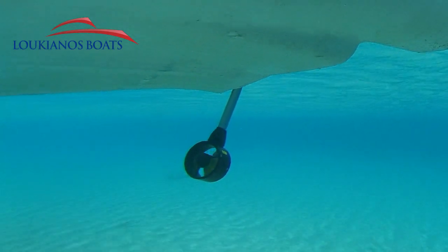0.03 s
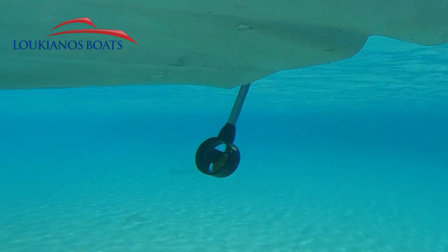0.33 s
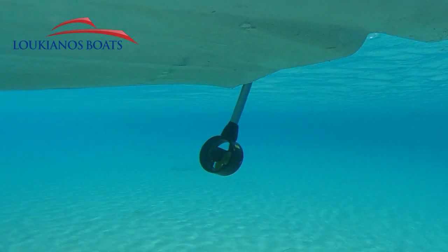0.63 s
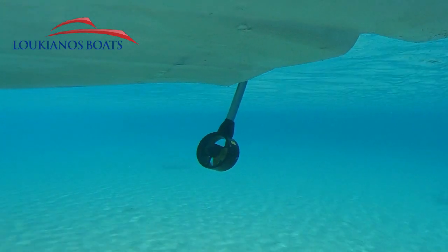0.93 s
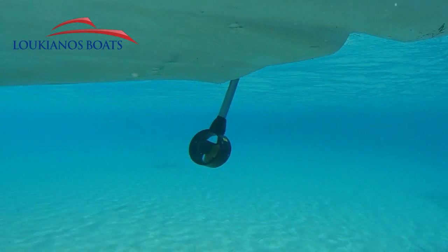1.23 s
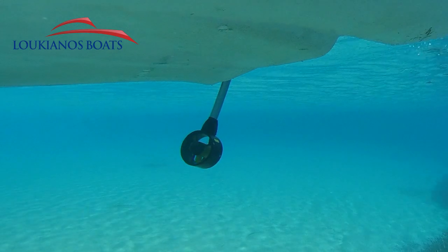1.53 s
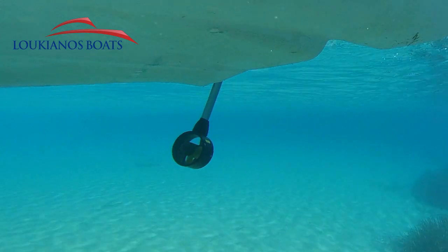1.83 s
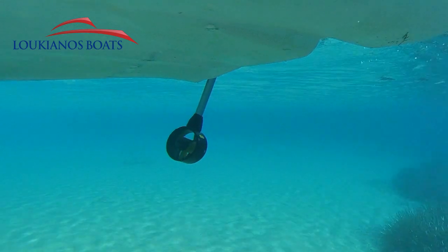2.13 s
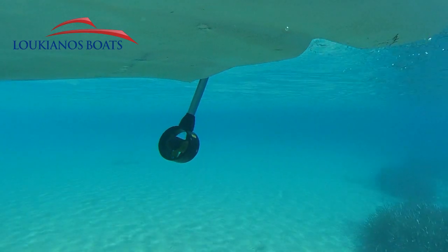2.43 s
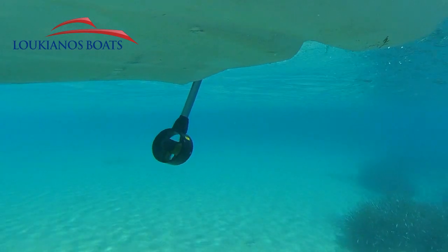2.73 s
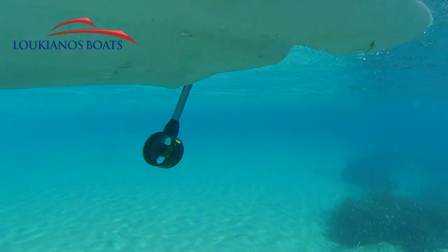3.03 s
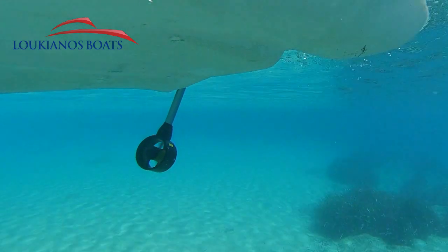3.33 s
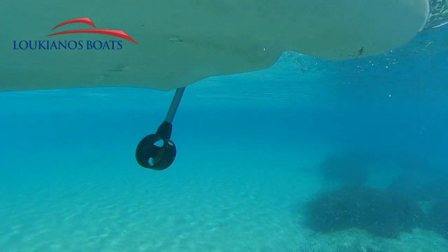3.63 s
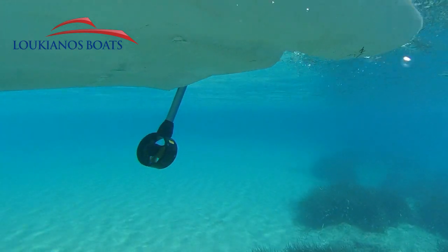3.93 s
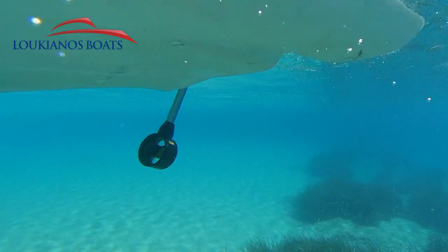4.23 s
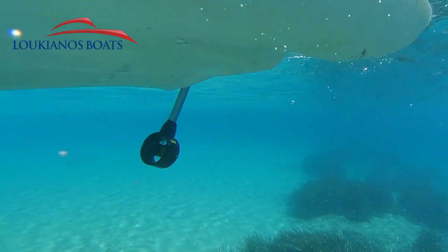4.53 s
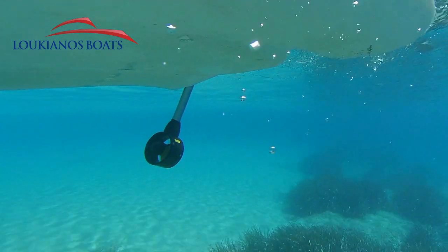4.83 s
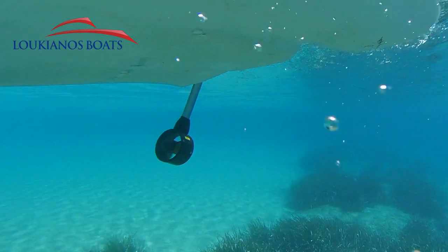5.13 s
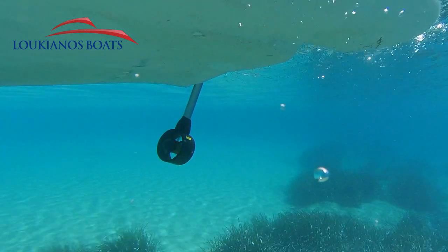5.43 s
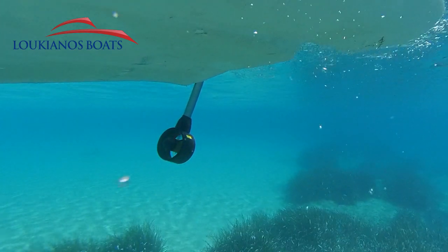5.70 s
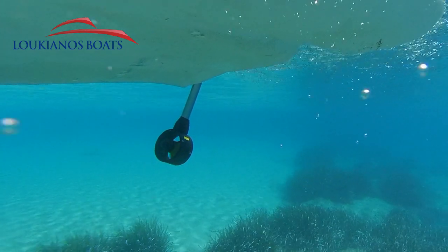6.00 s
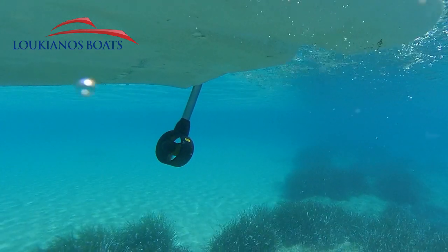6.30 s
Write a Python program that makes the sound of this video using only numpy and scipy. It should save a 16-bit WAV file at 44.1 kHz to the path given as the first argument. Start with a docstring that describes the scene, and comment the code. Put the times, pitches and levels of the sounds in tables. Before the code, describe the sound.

Underwater, an electric boat motor hums, then steps up to a faster hum as bubbles plink, fizz and gulp, with occasional sharp clicks.

```python
"""Electric outboard motor, underwater

A small boat's motor hums, heard from a camera in the water. Halfway the hum gives way to a faster one
and the wake arrives: small bubbles plink and fizz, then big ones gulp close by. Sharp clicks snap now
and then. The camera's case booms near 400 Hz and lets the treble in mostly on its left."""
import sys
import numpy as np
from scipy import signal
from scipy.fft import rfft, irfft
from scipy.io import wavfile
from scipy.ndimage import uniform_filter1d

SR = 44100
rng = np.random.default_rng(int(sys.argv[2]) if len(sys.argv) > 2 else 0)


def master(y):
    """Save y as 16-bit WAV."""
    cut = np.clip(np.atleast_2d(y).T, -1, 1)
    pcm = np.round(cut * 32767)  # scale
    wavfile.write(sys.argv[1], SR, pcm.astype(np.int16))


N = 289296
TIME, FREQS = np.arange(N) / SR, np.fft.rfftfreq(N, 1 / SR)


# How loud the slow hum and the fast hum are: t/s, level/dB
SLOW_LEVELS = [(0, -44.5), (.35, -40.5), (.75, -43), (1.5, -43.5), (2.5, -43.5), (2.8, -41.5), (3.0, -42),
               (3.15, -44.5)]
FAST_LEVELS = [(2.97, -57), (3.16, -35.5), (3.5, -35.5), (4.1, -36.5), (5, -32), (6.56, -33)]
# The tones in each hum: multiple of the shaft's turning rate, level/dB
SLOW_TONES = [(3, -7.5), (6, -15.5), (8, -37), (9, -11.5), (10, -26), (11, -19), (12, 2), (13, -4),
              (14, -11.5), (15, -10), (24, -19), (25, -23), (27, -28.5), (75, -29), (84, -19.5)]
FAST_TONES = [(1, -24.5), (3, -16.5), (4, -23.5), (6, -13.5), (9, 1), (10, -12), (11, -15), (12, -36),
              (14, -17), (84, -33.5)]

def motor(slow_turns_per_s=31.11, fast_turns_per_s=42.48, whine_hz=14165):
    """A slow hum gives way to a fast one, joined by the thin whine of the drive switching its current."""
    angle = 2 * np.pi * np.cumsum(whine_hz + 4 * drift(25.3)) / SR
    whine = amp(-70 + 3 * drift(15)) * np.sin(angle)
    sizzle = amp(-55) * drift(760) * np.cos(angle)
    fade_in = np.clip((TIME - FAST_LEVELS[0][0]) / 0.15, 0, 1)
    slow = hum(slow_turns_per_s, SLOW_LEVELS, SLOW_TONES)
    fast = hum(fast_turns_per_s, FAST_LEVELS, FAST_TONES)
    return slow + fast + fade_in * (whine + sizzle)


def hum(turns_per_s, levels, tones, throb_hz=389):
    """Tones locked to the propeller shaft beat together into one soft throb each turn."""
    times, level_db = np.transpose(levels)
    turns = np.cumsum(turns_per_s * (1 + 0.0012 * drift(5.2))) / SR
    out = np.zeros(N)
    for multiple, db in tones:
        lag = (multiple - throb_hz / turns_per_s) ** 2  # grows away from the strongest tones
        out += amp(db + 0.5 * drift(5)) * np.cos(2 * np.pi * multiple * turns - lag)
    running = uniform_filter1d(((TIME >= times[0]) & (TIME <= times[-1])) * 1., size=4000)
    return np.sqrt(2) * out * amp(np.interp(TIME, times, level_db)) * running


# The clearest big bubbles: t/s, level/dB, f/Hz, length/s
BIG_BUBBLES = [(1.471, -31, 400, 0.0077), (3.5, -11.5, 390, 0.0086), (4.796, -14, 424, 0.057),
               (4.832, -13.5, 437.5, 0.054), (4.893, -14.5, 422, 0.034), (4.937, -11, 630, 0.02),
               (4.94, -13.5, 455, 0.021), (5.03, -10, 447, 0.031), (5.069, -5, 417, 0.012),
               (5.083, -10.5, 418, 0.019), (5.154, -3, 381, 0.02), (5.214, -1.5, 386, 0.013),
               (5.228, -14, 334, 0.033), (5.278, -13, 470, 0.012), (5.31, -12.5, 360.4, 0.038),
               (5.457, -17, 368, 0.023), (5.574, -20, 356, 0.028), (5.59, -16, 340.8, 0.066),
               (5.615, -27, 326, 0.026), (5.662, -13.5, 342, 0.017), (5.766, -13.5, 387.5, 0.03),
               (5.811, -12.5, 386, 0.0067), (5.835, -14, 380, 0.05), (5.941, -8.5, 417, 0.012),
               (5.962, -6.5, 407, 0.015), (6.001, -3.5, 378, 0.017), (6.098, -5, 367, 0.031),
               (6.172, -16, 396, 0.017), (6.202, -5.5, 356.5, 0.028), (6.234, -10, 399, 0.025),
               (6.323, -7.5, 411.5, 0.03), (6.373, -14.5, 441, 0.032)]

def gulps(relax_s=0.0014, glide=0.0563):
    """A big bubble breaks off tight and high, relaxes, then lifts in pitch until it is choked off."""
    out, t = np.zeros(N), np.arange(5000) / SR
    case_note = bubble(hz=585, cycles=0.81, rise=0.22, glide=0.014)
    for start, db, hz, length in BIG_BUBBLES:
        shape = (1 - np.exp(-t * hz / 1.05)) * np.exp(-(t / length) ** 2)
        pitch = hz * (1 + 0.35 * np.exp(-t / relax_s) + glide * t / length)
        add(out, start, amp(db) * shape / shape.max() * np.sin(2 * np.pi * np.cumsum(pitch) / SR))
        add(out, start, amp(db - 15) * case_note)  # each gulp also rings the case's upper note
    return out


# The nearest small bubbles: t/s, level/dB, f/Hz
SMALL_BUBBLES = [(0.819, -15.5, 2610), (2.163, -32, 1740), (2.283, -24, 1440), (2.321, -30.5, 3020),
                 (2.541, -23, 3300), (2.847, -15, 1490), (2.894, -23.5, 1260), (2.933, -29, 1390),
                 (2.952, -27, 740), (3.02, -34, 2220), (3.135, -20.5, 1504), (3.178, -28, 1300),
                 (3.283, -26.5, 2560), (3.327, -23.5, 658), (3.4, -24.5, 1200), (3.43, -31, 2340),
                 (3.452, -20.5, 2340), (3.462, -17.5, 756), (3.475, -17.5, 1470), (3.501, -15.5, 660),
                 (3.503, -20, 1314), (3.545, -33, 1150), (3.579, -34, 2360), (3.6, -16, 2230),
                 (3.62, -22, 1730), (3.676, -30, 1460), (3.691, -18.5, 2460), (3.741, -20, 1350),
                 (3.756, -24.5, 1440), (3.772, -12, 2020), (3.916, -7.5, 766), (3.934, -20, 1280),
                 (3.9861, -9, 1564), (4.008, -12.5, 2430), (4.017, -15, 2540), (4.018, -21.5, 1050),
                 (4.05, -11, 710), (4.053, -18, 1090), (4.094, -18, 676), (4.1, -15.5, 1115),
                 (4.125, -16.5, 567), (4.156, -20.5, 1400), (4.169, -20.5, 1230), (4.207, 1.5, 554),
                 (4.209, -4.5, 691), (4.238, -16, 1400), (4.26, -17, 2310), (4.275, -8.5, 3740),
                 (4.282, -14, 2920), (4.281, -15, 1980), (4.353, -15, 2260), (4.373, -20, 2640),
                 (4.414, -19.5, 636), (4.487, -23, 1250), (4.51, -14.5, 663), (4.541, -20.5, 1170),
                 (4.633, -15, 1890), (4.649, -18.5, 1240), (4.721, -21, 2850), (4.765, -20, 4420),
                 (4.796, -19, 556), (4.845, -16, 2060), (4.909, -13, 644), (4.985, -14, 630),
                 (5.004, -9, 570), (5.015, -17.5, 1000), (5.023, -21, 1150), (5.034, -7, 617),
                 (5.036, -18, 1410), (5.196, -15, 2510), (5.28, -17.5, 995), (5.325, -22, 1130),
                 (5.403, -20.5, 814), (5.477, -18.5, 1630), (5.549, -19, 2760), (5.555, -13, 653),
                 (5.607, -16, 670), (5.642, -21, 2410), (5.645, -16, 670), (5.661, -24, 3070),
                 (5.666, -16.5, 667), (5.702, -23.5, 2470), (5.725, -31, 1530), (5.736, -12, 622),
                 (6.002, -14, 753), (6.155, -29, 2670), (6.211, -22, 2920), (6.233, -16, 687),
                 (6.371, -14.5, 957)]

def plinks(case_hz=416.5, hardest_knock_hz=804):
    """Each near bubble rings, sheds a short crackle just below its own pitch and knocks on the case with its
    pressure."""
    out, knock = np.zeros(N), bubble(case_hz, cycles=1.62, rise=0.92, glide=0)
    for start, db, hz in SMALL_BUBBLES:
        add(out, start, amp(db) * bubble(hz, cycles=4.6, rise=0.6, glide=0.03))
        add(out, start, amp(db - 11) * crackle(0.86 * hz))
        octaves_away = abs(np.log2(hz / hardest_knock_hz))
        add(out, start, amp(db - 1.5 - 8 * octaves_away) * knock)
    return cut_bass(out, 174)  # a bubble gives off little bass


def bubble(hz, cycles, rise, glide):
    """One bubble rings and dies away, its pitch lifting as it floats up."""
    age = np.arange(int(7 * cycles * SR / hz)) * hz / SR  # counted in cycles, like the rise and fade
    shape = (1 - np.exp(-age / rise)) * np.exp(-age / cycles)
    return shape / shape.max() * np.sin(2 * np.pi * age * (1 + glide * age / cycles / 2))


def crackle(hz, fade_s=0.0051):
    """A short puff of noise around one pitch."""
    t, freqs = np.arange(2048) / SR, np.fft.rfftfreq(2048, 1 / SR)
    fizz = irfft(rfft(rng.standard_normal(len(t))) * band(freqs, hz, octaves=0.74))
    puff = fizz * (1 - np.exp(-t * hz)) * np.exp(-t / fade_s)
    return puff / abs(puff).max()


# How thick the wake is around the camera: t/s, large bubbles' level/dB, small bubbles' level/dB
WAKE_THICKNESS = [(2.7, -13, -28), (3.1, -12, -5), (3.4, -10.5, -14), (3.5, -4, -1.5), (3.95, -2.5, -2),
                  (4.15, 2, 3.5), (4.65, -1, -1), (5.05, 1.5, 0.5), (5.55, -0.5, -3.5), (6.0, -6.5, -6),
                  (6.56, -2, -0.5)]

def wake():
    """Clouds of bubbles swell over a soft wash of far ones as the wake arrives; faint pips never stop."""
    times, large, small = np.transpose(WAKE_THICKNESS)
    fade_in = np.clip((TIME - times[0]) / 0.35, 0, 1)
    clumps = unit(amp(2.3 * drift(25)))  # shared by bubbles of every size
    gurgle = cloud(515, 1080, per_s=900, spread_db=5, tilt_db=-10, cycles=4.7, clumping=0.39, sizes=14)
    babble = cloud(1082, 1655, per_s=400, spread_db=5, tilt_db=-1, cycles=6, clumping=0.5, sizes=8)
    fizz = cloud(1900, 5200, per_s=1000, spread_db=6, tilt_db=-14, cycles=10, clumping=0.75, sizes=22)
    spray = cloud(7370, 13900, per_s=540, spread_db=14.5, tilt_db=-12, cycles=8.8, clumping=.49, sizes=16)
    layers = (swell(large, db=-29, follow=1.76) * gurgle
              + swell(large, db=-37, follow=1) * babble
              + swell(small, db=-43, follow=0.9) * fizz
              + swell(small, db=-51, follow=1.96) * spray
              + swell(large, db=-41.5, follow=0.96) * wash())
    pips = cloud(1248, 6070, per_s=180, spread_db=5, tilt_db=1, cycles=7.7, clumping=0.39, sizes=14)
    return fade_in * clumps * layers + amp(-63) * pips


def swell(thickness_db, db, follow):
    """A layer grows louder with the wake, by `follow` dB for each dB of thickness."""
    times = np.transpose(WAKE_THICKNESS)[0]
    return amp(db + follow * np.interp(TIME, times, thickness_db))


def cloud(low_hz, high_hz, per_s, spread_db, tilt_db, cycles, clumping, sizes):
    """Bubbles of many sizes are born in clumps; tilt_db is the change in level for each octave up."""
    out, chance = np.zeros((2, N)), per_s / sizes / SR * np.exp(clumping * drift(25))
    for hz in np.geomspace(low_hz, high_hz, sizes):
        births = rng.random(N) < chance
        strengths = amp(spread_db * np.minimum(rng.exponential(1, N), 3.5))
        ring = bubble(hz, cycles * (.5 + rng.random()), rise=1, glide=rng.uniform(-0.011, 0.058))
        rings = signal.oaconvolve(births * strengths, ring / np.linalg.norm(ring))[:N]
        rings *= amp(tilt_db * np.log2(hz / low_hz))
        delay = round(rng.normal(0, .0001) * SR)  # each direction has its own left-right delay
        out += [rings, np.roll(rings, delay)]
    return unit(out)


# Two surges of big bubbles passing by: middle t/s, level/dB, half length/s
BUBBLE_SURGES = [(5.086, 1.5, 0.19), (6.02, -4, 0.46)]

def surges():
    """In each surge many weaker big bubbles glug at the case's two low notes."""
    strength = sum(amp(db) * bump(middle, half_s) for middle, db, half_s in BUBBLE_SURGES)
    low = cloud(361, 470, per_s=120, spread_db=5.5, tilt_db=14, cycles=5, clumping=0.31, sizes=10)
    high = cloud(632, 667, per_s=92, spread_db=0, tilt_db=5, cycles=13, clumping=0.51, sizes=6)
    return strength * amp(-25.5) * low + strength ** 2 * amp(-30.5) * high


# The largest swarms of bubbles: middle t/s, level/dB, centre f/Hz, half length/s
SWARMS = [(3.562, -38.5, 3140, 0.018), (3.768, -28, 1730, 0.03), (4.136, -37, 4260, 0.019),
          (4.299, -34, 8550, 0.0077), (4.325, -38, 4700, 0.0065), (4.378, -35.5, 4500, 0.031),
          (4.503, -37, 2920, 0.0084), (4.672, -36, 4560, 0.0058), (4.71, -41.5, 3360, 0.055),
          (4.758, -36.5, 4600, 0.0058), (4.944, -29, 1460, 0.013), (5.03, -23.5, 1280, 0.023),
          (5.331, -23, 1370, 0.013), (5.4, -34.5, 1150, 0.031), (5.512, -39, 1700, 0.013),
          (5.739, -35.5, 3930, 0.0066), (6.145, -38.5, 4280, 0.0082), (6.319, -29.5, 1070, 0.048)]

def swarms():
    """Pockets of air break into short, dense swarms of bubbles of roughly one size."""
    dense = cloud(631, 9700, per_s=3300, spread_db=6.5, tilt_db=-4.5, cycles=8, clumping=0.39, sizes=32)
    out = np.zeros((2, N))
    for middle, db, hz, half_s in SWARMS:
        swarm = unit(filtered(dense, band(FREQS, hz, octaves=1)))
        out += amp(db) * swarm * bump(middle, half_s)
    return out


# The sharpest clicks: t/s, level/dB, centre f/Hz, width/octaves
SHARP_CLICKS = [(0.175, -20.5, 7800, 0.71), (0.367, -26, 8300, 0.88), (0.502, -28.5, 6900, 1.4),
                (0.71, -13, 7300, 1.4), (0.711, -19.5, 2270, 0.26), (0.71, -37, 1200, 0.3),
                (0.82, -24, 3900, 0.68), (0.848, -21.5, 7600, 0.4), (0.87, -26.5, 7640, 0.11),
                (.952, -23.5, 8640, 0.3), (1.011, -27, 14000, 0.41), (1.083, -25.5, 8200, 0.49),
                (1.605, -30, 8300, 0.43), (1.644, -36, 4060, .3), (1.693, -19.5, 12500, 0.94),
                (1.889, -22.5, 6800, 1.13), (2.07, -31, 7800, 0.39), (2.204, -16.5, 4350, 1.02),
                (2.311, -22, 7140, 1.1), (2.54, -23.5, 2750, 2.1), (3.322, -29.5, 10000, 0.76),
                (3.398, -25.5, 4970, 0.18), (3.797, -7, 3030, 0.53), (3.809, -9, 11400, 1.3),
                (3.808, -4, 2620, 0.61), (3.816, -11.5, 4240, 0.5), (3.835, -13, 6430, 0.3),
                (3.995, -20.5, 4200, 0.43), (4.034, -24, 3900, 0.2), (4.509, -19.5, 8960, 0.16),
                (5.586, -23.5, 10300, 0.21), (5.857, -9, 3260, 0.5), (5.858, -12.5, 11200, 0.29)]
# How the case colours a click: f/Hz, level/dB
CLICK_COLOUR = [(500, 18), (1300, 11), (2400, 4.5), (3600, 2.5), (4800, 4.5), (6200, -1.5), (7700, 2),
                (10000, 2.5), (12700, 2), (15000, -3.5)]

def clicks(snap_s=0.0011, rattle_s=0.0023):
    """A snap reaches each microphone by its own path and leaves a duller rattle in the case."""
    out, t, freqs = np.zeros((2, N)), np.arange(2048) / SR, np.fft.rfftfreq(2048, 1 / SR)
    faint_clicks = [(when * N / SR, -38 + 6 * (size - .5), 5500 * 2 ** (pitch - .5), 0.7)
                    for when, size, pitch in rng.random((12, 3))]
    dulling = 1 / (1 + (freqs / 4500) ** 2)
    lead_in = 64  # samples of room for the click's onset
    for start, db, hz, octaves in faint_clicks + SHARP_CLICKS:
        snap_noise, rattle_noise = rng.standard_normal((2, 2, len(t)))
        snap = rfft(snap_noise * np.exp(-t / snap_s))
        rattle = amp(4) * rfft(rattle_noise * np.exp(-t / rattle_s)) * dulling
        colour = band(freqs, hz, octaves) * amp(look_up(CLICK_COLOUR, freqs))
        both_sides = np.roll(irfft((snap + rattle) * colour), lead_in, axis=1)
        for side, click in zip(out, both_sides):
            add(side, start - lead_in / SR, amp(db) * click / abs(click).max())
    return out


# The colour of far-off bubbles: f/Hz, level/dB
WASH_COLOUR = [(450, -23), (720, 3), (1000, -8), (1450, -4), (2400, -9.5), (5000, -25), (8000, -48)]

def wash():
    """Far bubbles blur into a soft noise, different on each side."""
    return np.array([noise(WASH_COLOUR), noise(WASH_COLOUR)])


# The colours of the water's rumble and the case's boom: f/Hz, level/dB
RUMBLE_COLOUR = [(10, -45), (25, -3), (38, -11.5), (60, -10.5), (110, -10.5), (200, -17.5), (300, -3.5),
                 (600, -41.5)]
BOOM_COLOUR = [(100, -28), (200, -13.5), (285, -15), (335, -1), (420, 2.5), (460, -5), (600, -48),
               (800, -18), (1200, -37.5)]

def flow():
    """Moving water rumbles and keeps the case booming, more so in the wake; one eddy rolls past."""
    _, large, _ = np.transpose(WAKE_THICKNESS)
    eddy = amp(-41) * bump(middle_s=6.45, half_s=0.078)
    rumble = (swell(large, db=-51.5, follow=0.24) + eddy) * noise(RUMBLE_COLOUR)
    boom = swell(large, db=-37, follow=0.77) * noise(BOOM_COLOUR)
    return rumble + boom


# The colour of the hiss: f/Hz, level/dB
HISS_COLOUR = [(200, -26), (500, 18), (760, 13), (1000, 3.5), (1400, 2), (1850, 9), (2350, 12),
               (3150, -2.5), (3550, 5.5), (6500, 0.5), (9000, 7.5), (12000, 5), (15000, 7.5), (15600, 8.5)]
# Which way the hiss leans: f/Hz, left minus right level/dB
HISS_BALANCE = [(400, 26), (750, 14), (1150, 4), (1700, -2), (2400, 5), (3700, 6.5), (5500, -0.5),
                (8500, 8), (15000, 5.5)]

def hiss():
    """A steady hiss, unrelated in the two microphones."""
    return amp(-48.5) * filtered([noise(HISS_COLOUR), noise(HISS_COLOUR)], left_right(HISS_BALANCE))


def echoes(sound, fade_s=0.059):
    """Hull, surface and sand send back a brief wash of treble, different on each side."""
    t = np.arange(4000) / SR
    tail = rng.standard_normal((2, len(t))) * amp(-60 * t / fade_s) * (1 - np.exp(-t / 0.00027))
    tail = cut_bass(tail / np.linalg.norm(tail[0]), 464)
    return signal.oaconvolve(sound, tail, axes=1)[:, :N]


# The pitches that the case's walls boost or weaken: f/Hz, level/dB
WALL_COLOUR = [(560, -1), (740, -0.5), (960, -3), (1400, 0), (1950, -6), (2350, 1), (2800, 1), (3250, -6),
               (3600, -1), (4150, -1.5), (4800, 4.5), (6300, -2.5), (8000, -2)]

def case_walls(sound):
    """Bubbles farther off are heard through the ringing walls of the case."""
    return filtered(sound, amp(look_up(WALL_COLOUR, FREQS)))


# Which microphone the case favours: f/Hz, left minus right level/dB
CASE_BALANCE = [(60, -2.5), (200, -1), (330, -2.5), (450, -7), (630, 2.5), (760, 4), (1000, 11), (1600, 4),
                (2500, 13), (4200, 13.5), (5600, 1), (8500, 22), (15000, 2.5)]
# How far the left side's wave runs ahead: f/Hz, phase/radians
LEFT_LEAD = [(150, 0.37), (390, 0.47), (470, 1.32), (630, 1.3), (760, 3.3), (900, 4.23), (1400, 5.13)]

def case_microphones(sound):
    """The case passes each pitch to its two microphones with a different strength and timing."""
    timing = np.exp(1j * np.outer([1, 0], look_up(LEFT_LEAD, FREQS)))
    return filtered(sound, left_right(CASE_BALANCE) * timing)


def amp(db):
    """Turns decibels into a gain."""
    return 10 ** (np.asarray(db) / 20)


def unit(x):
    """Scales a signal to an average power of one."""
    return x / np.sqrt(np.mean(x ** 2) + 1e-20)


def add(mix, start_s, sound):
    """Adds a sound into the mix at the given time."""
    part = mix[max(round(start_s * SR), 0):][:len(sound)]
    part += sound[:len(part)]


def bump(middle_s, half_s):
    """A gain that swells and fades evenly around one moment."""
    return np.exp(-((TIME - middle_s) / half_s) ** 2)


def band(freqs, centre_hz, octaves):
    """Gains that keep only the pitches around a centre."""
    return np.exp(-(np.log2((freqs + 1) / centre_hz) / octaves) ** 2)


def look_up(table, freqs):
    """Reads between a table's rows, with octaves evenly spaced."""
    hz, values = np.transpose(table)
    return np.interp(np.log(freqs + 1), np.log(hz), values)


def left_right(balance):
    """Left and right gains for every frequency, keeping the average power."""
    lean = amp(look_up(balance, FREQS))
    return np.array([lean, np.ones_like(lean)]) / np.sqrt((1 + lean ** 2) / 2)


def filtered(sound, gains):
    """Gives each frequency of a sound its own gain."""
    return irfft(rfft(sound) * gains, N)


def cut_bass(sound, hz):
    """Weakens everything below hz."""
    return signal.sosfilt(signal.butter(2, hz, "high", fs=SR, output="sos"), sound)


def noise(colour):
    """Noise with the given level at each frequency."""
    return unit(filtered(rng.standard_normal(N), amp(look_up(colour, FREQS))))


def drift(per_s):
    """A random wobble that changes up to about per_s times a second."""
    return unit(filtered(rng.standard_normal(N), np.exp(-(FREQS / per_s) ** 2)))


def scene():
    """All the water's sound reaches the two microphones through the case."""
    bubbles = plinks() + case_walls(wake() + amp(3.5) * swarms())
    snaps = clicks()
    reflected = echoes(amp(-6.5) * bubbles + amp(-8.5) * snaps)
    water = motor() + flow() + gulps() + surges() + bubbles + snaps + reflected
    return case_microphones(water) + hiss()


def record(dry, top_hz=15900):
    """Rounds off the loudest peaks softly, then cuts the highest treble."""
    rounded = dry / (1 + dry ** 6) ** (1 / 6)
    treble_cut = signal.firwin(301, top_hz, window=("kaiser", 9), fs=SR)
    return signal.oaconvolve(rounded, treble_cut[None], "same")


dry = scene()
out = record(dry)
master(out)
```